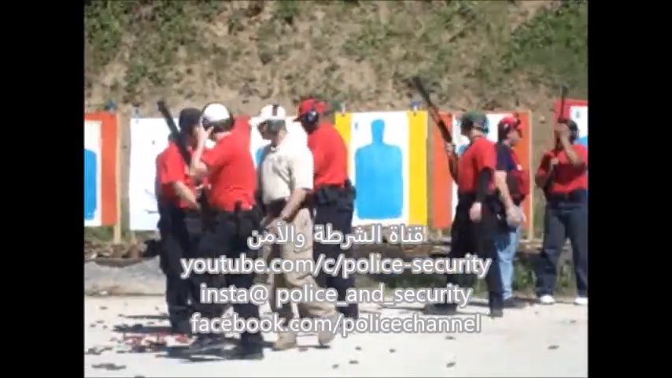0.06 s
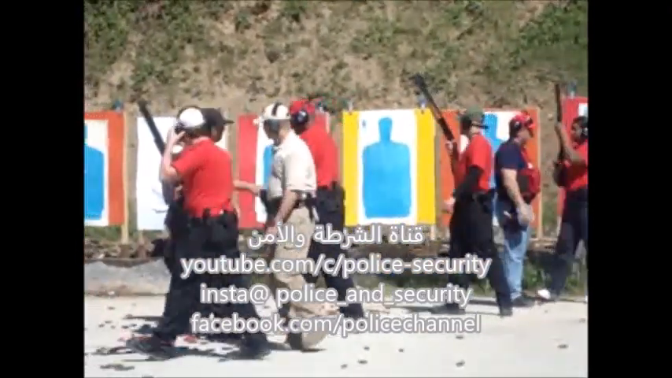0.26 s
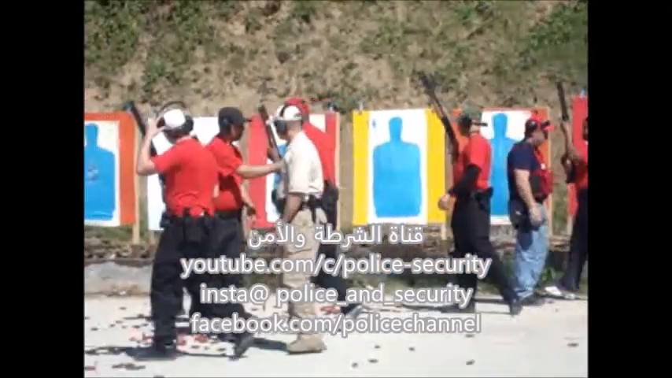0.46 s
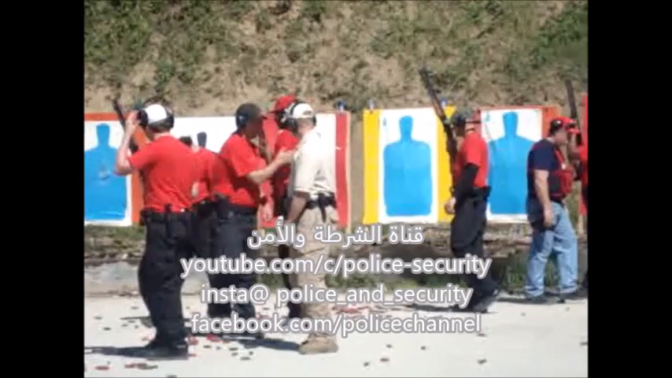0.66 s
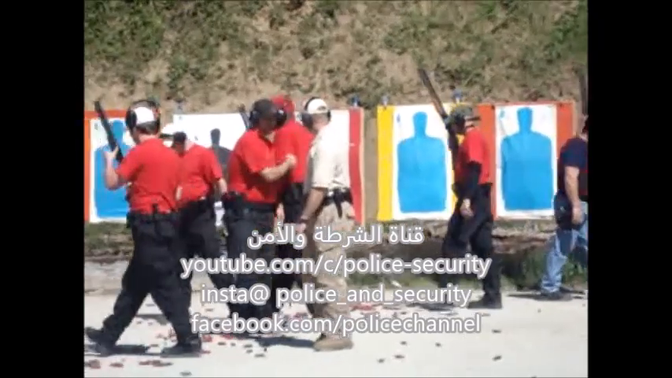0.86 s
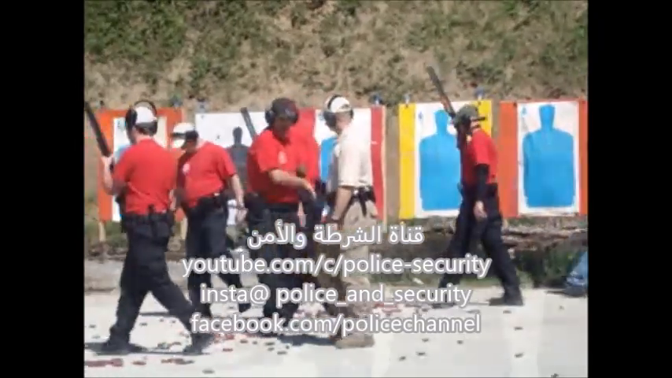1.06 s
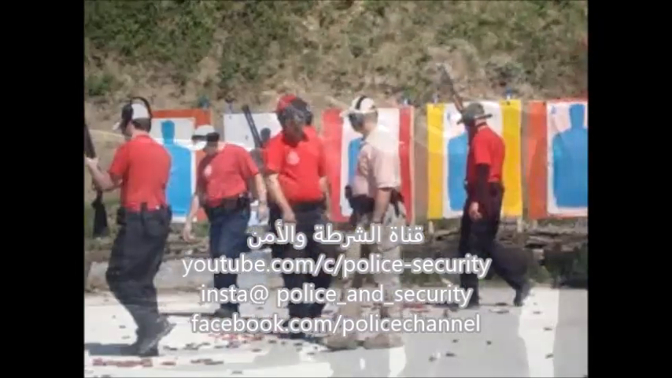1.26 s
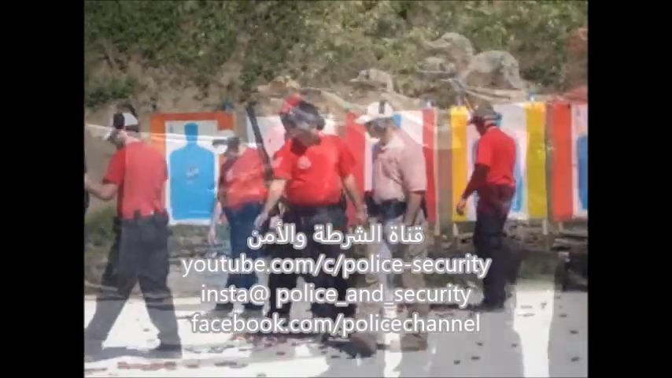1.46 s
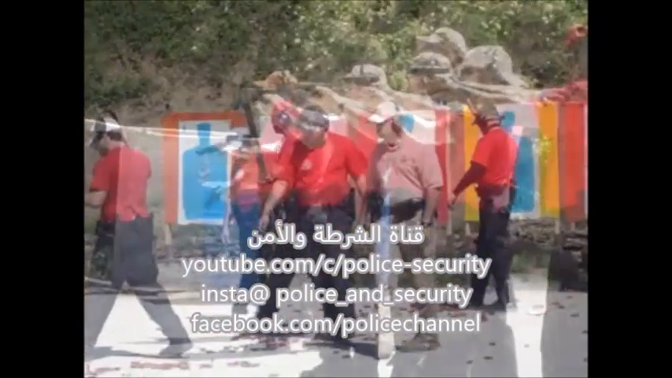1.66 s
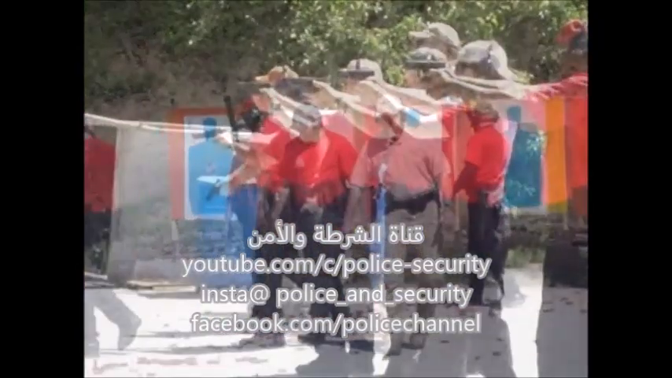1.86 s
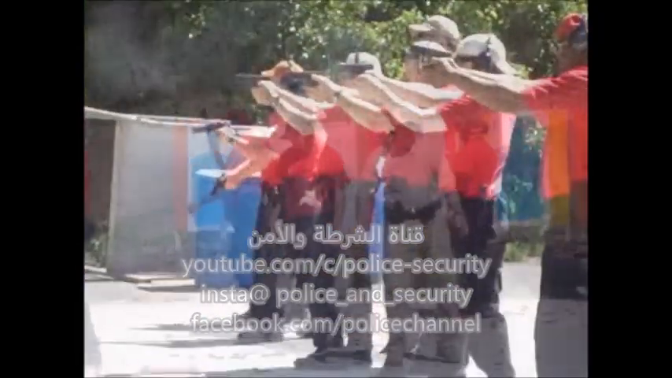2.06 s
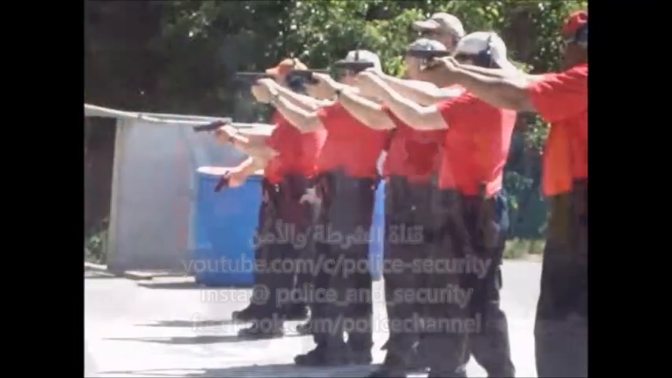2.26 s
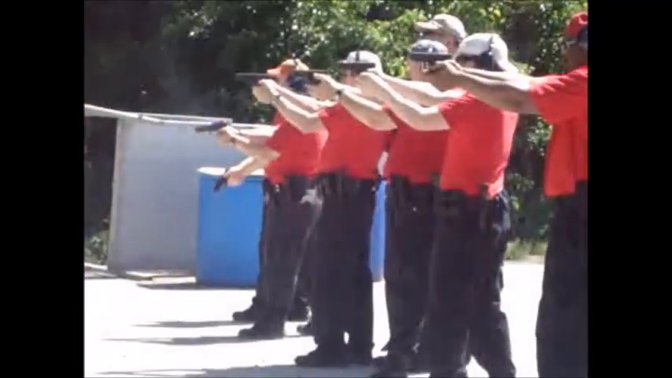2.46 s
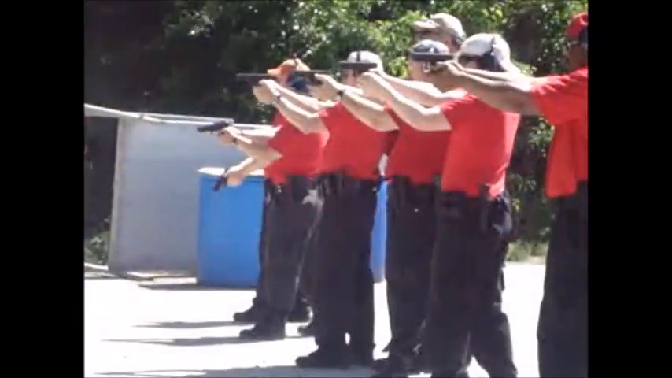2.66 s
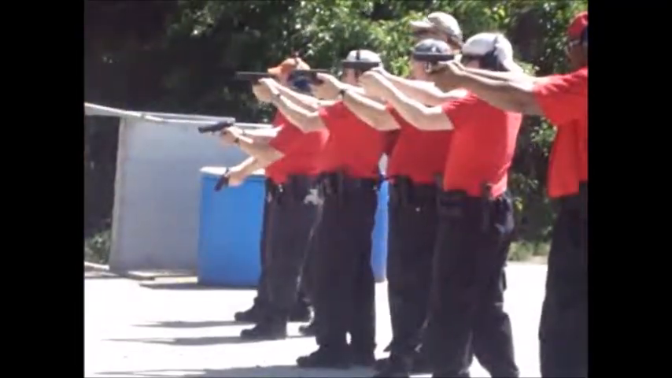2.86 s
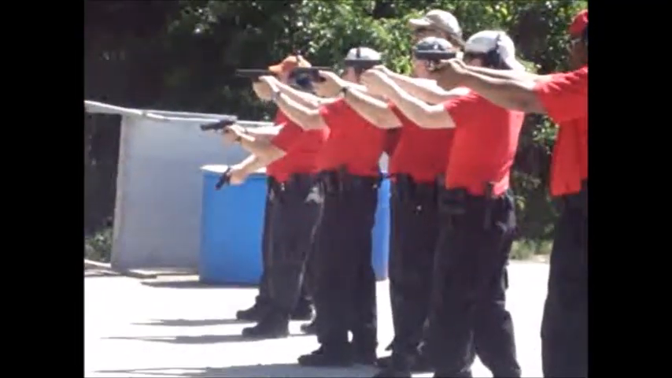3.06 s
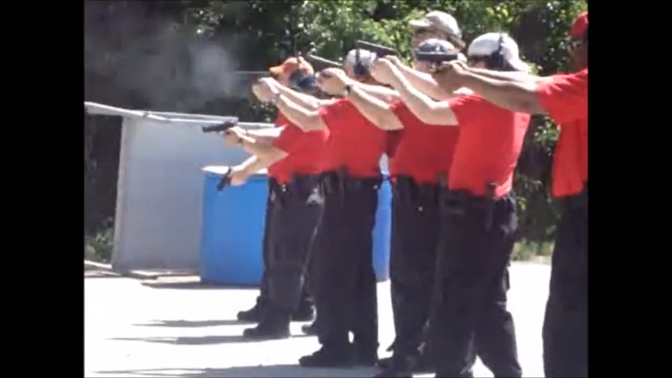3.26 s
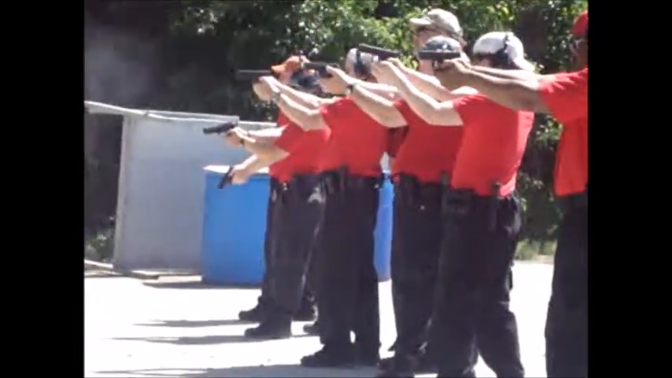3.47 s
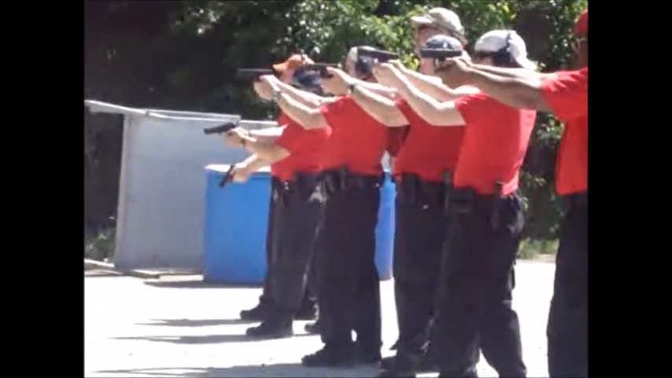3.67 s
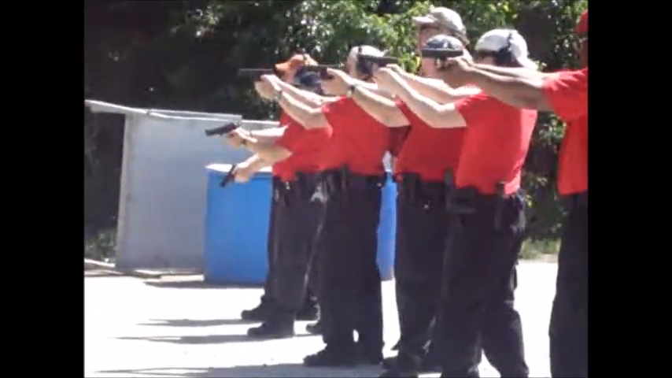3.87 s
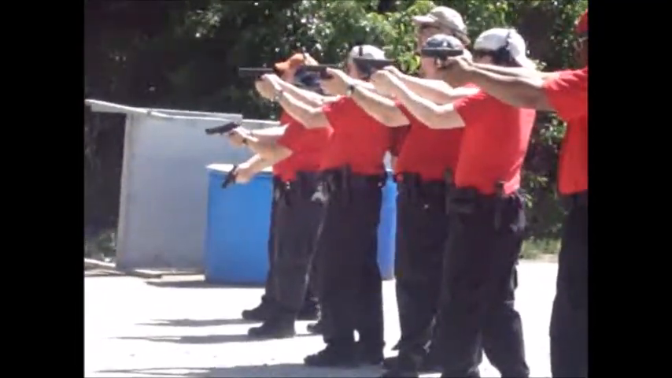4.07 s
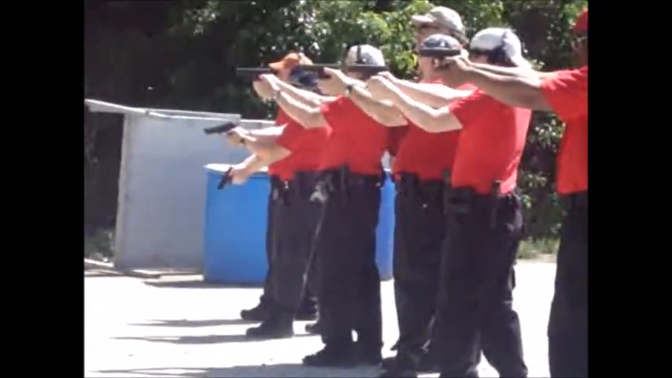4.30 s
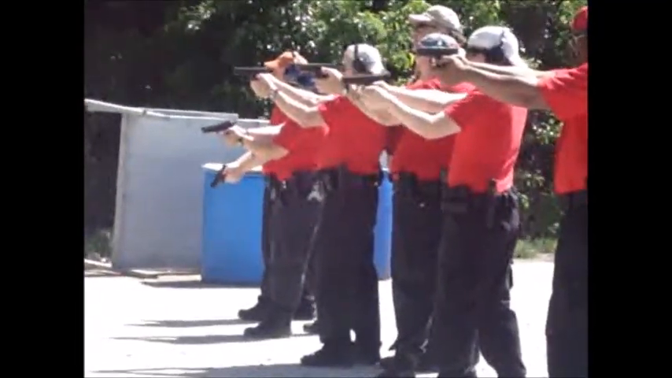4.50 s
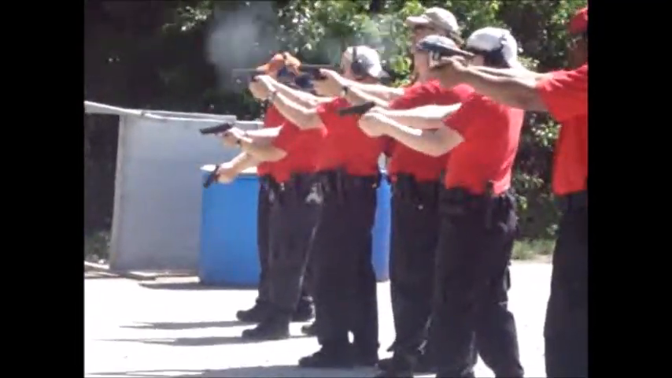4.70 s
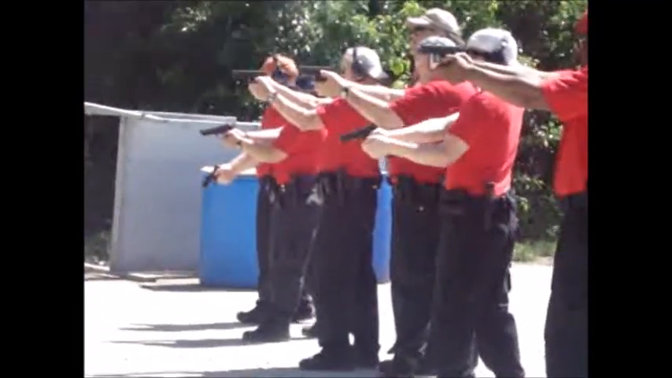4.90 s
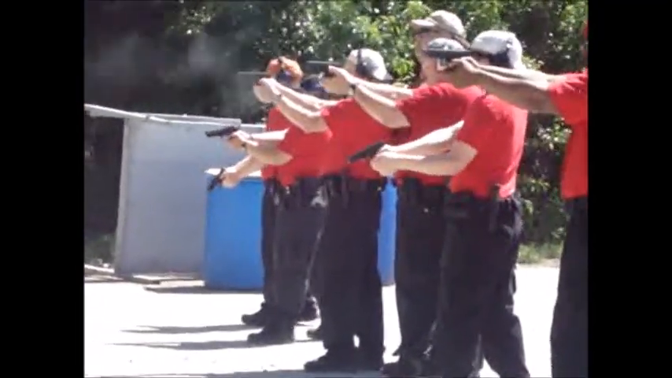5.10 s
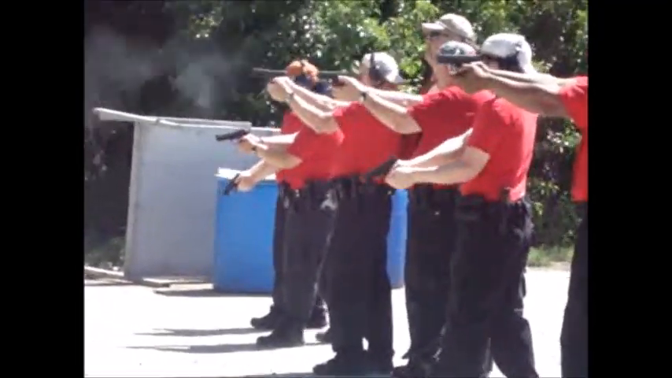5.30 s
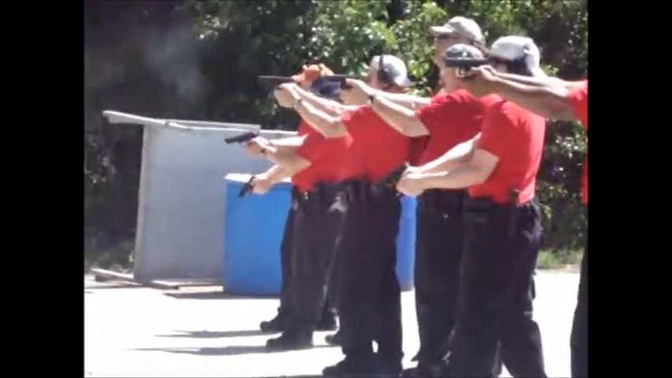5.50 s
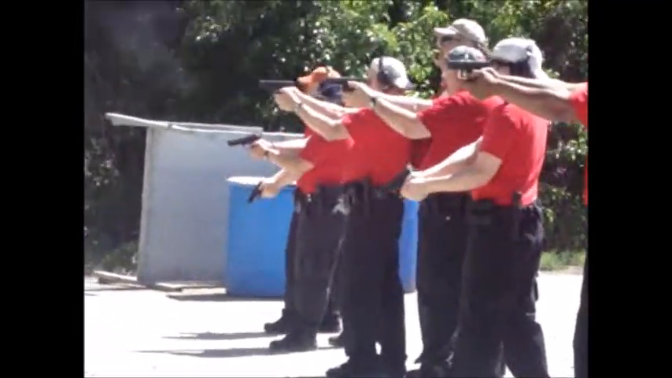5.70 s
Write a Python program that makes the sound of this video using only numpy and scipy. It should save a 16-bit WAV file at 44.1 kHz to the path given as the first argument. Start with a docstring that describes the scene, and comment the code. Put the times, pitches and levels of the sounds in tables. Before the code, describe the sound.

Gun parts clink lightly against a steady far-off roar before a shotgun blast rolls away in the open air. After a few more clinks and dull distant knocks, nearby pistols crack once, then twice in quick succession, then three times. Each crack bounces off a wall and an earth bank and fades among trees. In the later gaps, a soft hush and a faint tone like loudspeaker feedback creep up.

```python
"""Small steel clinks over a distant roar, then a shotgun blast and six pistol shots on an outdoor range.
Each pistol crack reflects off the ground, a side wall and an earth bank, then reverberates in the trees.
Gun parts and spent cases ring at their natural frequencies, and something knocks far off.
The roar gives way to a hush and a ringing tone near 400 Hz, like loudspeaker feedback;
both sink after each pistol shot and swell back. A limiter squeezes the peaks."""
import sys
import numpy as np
from scipy import signal
from scipy.fft import rfft, irfft
from scipy.io import wavfile
from scipy.ndimage import uniform_filter1d

SR = 44100
rng = np.random.default_rng(int(sys.argv[2]) if len(sys.argv) > 2 else 0)


def unload_wav(signal):
    """Save mono or channel-first audio to the path in sys.argv[1] as 16-bit WAV at rate SR, clipped to [-1, 1]."""
    wavfile.write(
        sys.argv[1],
        SR,
        np.round(np.clip(np.atleast_2d(signal).T, -1, 1) * 32767).astype(np.int16),
    )


N = 253342

# shots along the firing line: (time [s], crack [dB], wall echo [dB], bank echo [dB], bank delay [s],
# scatter [dB], tree echo tilt [dB/octave], tree echo decay time [ratio])
PISTOL_SHOTS = [(2.0954, 3.5, -0.5, 1, .0375, -14, 0, 0.89), (3.153, -2, 6, 1.5, .0407, -15.5, -0.2, 0.73),
                (3.2737, 4.5, 6, -1.5, .0391, -21.5, 0.34, 1.09),
                (4.7748, -1.5, 1, 1, 0.042, -15.5, 0.4, 0.93), (5.0266, -2, 4.5, 0, .0392, -18.5, 0, 0.65),
                (5.2486, 5, -3, -4, 0.037, -21, 1.26, 0.89)]
GROUND_DELAY_S, WALL_DELAY_S, TREE_DELAY_S = .001, .0217, .06
def pistols():
    """Multipath propagation: each shot arrives directly, then later by every longer, reflected path."""
    out = np.zeros(N)
    for s, crack_db, wall_db, bank_db, bank_delay, scatter_db, tilt_db, t60_scale in PISTOL_SHOTS:
        muzzle_crack(out, s, crack_db)
        slaps(out, s, crack_db, wall_db, bank_db, bank_delay)
        near_scatter(out, s, scatter_db)
        far_echoes(out, s, scatter_db, tilt_db, t60_scale)
    return out


# spectrum of the muzzle pulse: (frequency [Hz], level [dB])
CRACK_SPECTRUM = [(30, -26), (150, -13), (400, -9.5), (750, 0.5), (1100, 1), (1700, -6.5), (4000, -5.5),
                  (7000, -10.5), (9500, -18.5), (12000, -52)]
def muzzle_crack(out, s, db):
    """Two-path interference: the pressure pulse overlaps its weaker bounce off the ground."""
    crack = -pulse(CRACK_SPECTRUM)
    add(out, s, amp(db) * crack)
    add(out, s + GROUND_DELAY_S, amp(db - 4) * crack)


# glances off the neighbouring shooters: (delay [s], level re the crack [dB])
GLANCES = [(.0021, -11), (.0036, -11.5), (.0049, -11.5)]
# spectra of the wall's slap and of the thud off shooters and bank: (frequency [Hz], level [dB])
SLAP_SPECTRUM = [(30, -27), (150, -27), (320, -19), (550, -1.5), (800, 2.5), (1250, -7), (2100, 1),
                 (3300, -12.5), (6000, -21), (9500, -56), (12000, -47)]
THUD_SPECTRUM = [(30, -41), (150, -25), (400, -12), (650, 2), (950, -3.5), (1300, -8.5), (2100, -11),
                 (4000, -17.5), (7000, -25), (9500, -33), (12000, -60)]
def slaps(out, s, crack_db, wall_db, bank_db, bank_delay):
    """Early reflection: shooters, side wall and earth bank each return a delayed, coloured pulse."""
    slap, thud = -pulse(SLAP_SPECTRUM), -pulse(THUD_SPECTRUM)
    for delay, db in GLANCES:
        add(out, s + delay, amp(crack_db + db) * thud)
    add(out, s + WALL_DELAY_S, amp(wall_db) * slap)
    add(out, s + bank_delay, amp(bank_db) * thud)


# spectrum of the firing line's scatter: (frequency [Hz], level [dB])
SCATTER_SPECTRUM = [(35, -69), (60, -39), (221, -16), (510, -2.5), (929, 1.5), (1520, -8), (2010, -8),
                    (2330, -8.5), (5040, -7), (6380, -10.5), (7100, -16.5), (8980, -17), (10000, -23.5),
                    (13000, -65), (22000, -120)]
def near_scatter(out, s, db):
    """Diffuse scattering from the firing line: bright before the wall's slap, duller after it."""
    bright = reverberation(SCATTER_SPECTRUM, start=.0012, rise=.00088, hold=.019, t60_scale=.079,
                           clump_db=1.5, tilt_db=.42, grain_db=4.5)
    dull = reverberation(SCATTER_SPECTRUM, start=.0032, rise=.0026, hold=.03, t60_scale=.11,
                         clump_db=1.5, tilt_db=-.62, grain_db=6)
    add(out, s, amp(db) * bright)
    add(out, s + WALL_DELAY_S, amp(db - .5) * dull)


# two farther reflectors: (delay [s], level re the scatter [dB])
REFLECTORS = [(.06, -1), (.144, -1.5)]
# spectra returned by those reflectors and by the trees: (frequency [Hz], level [dB])
REFLECTOR_SPECTRUM = [(60, -55.5), (200, -31), (400, -17), (750, 9), (1100, -3), (1700, -6), (4000, -23),
                      (7000, -15), (10000, -29)]
TREE_SPECTRUM = [(35, -69), (60, -42.5), (199, -27.5), (299, -17.5), (362, -12), (556, -3.5), (817, 0.5),
                 (1250, -5), (1660, -11), (2330, -8.5), (2830, -9), (5150, -9.5), (7570, -18),
                 (9380, -22.5), (10000, -31), (13000, -67), (22000, -120)]
def far_echoes(out, s, scatter_db, tilt_db, t60_scale):
    """Multiple scattering among the trees makes a long tail, from which two discrete echoes stand out."""
    tail = reverberation(TREE_SPECTRUM, start=0, rise=.004, hold=.051, t60_scale=t60_scale,
                         clump_db=.8, tilt_db=tilt_db)
    add(out, s + TREE_DELAY_S, amp(scatter_db - 2.5) * tail)
    for delay, db in REFLECTORS:
        add(out, s + delay, amp(scatter_db + db) * burst(REFLECTOR_SPECTRUM, decay=.0092))


# spectrum of the shotgun's scattered blast: (frequency [Hz], level [dB])
BLAST_SPECTRUM = [(88, -58), (150, -44), (319, -21), (381, -10.5), (431, -10), (591, -5), (1020, -1.5),
                  (1730, -16.5), (2680, -8.5), (2970, -8), (4150, -8), (4700, -11.5), (5310, -13),
                  (8690, -21.5), (10000, -32.5), (13000, -70), (22000, -120)]
def shotgun(s=1.071, db=-12):
    """Directivity: fired away from the listener, the blast is heard only as scatter that rolls off."""
    out = np.zeros(N)
    blast = reverberation(BLAST_SPECTRUM, start=.00033, rise=.0059, hold=.069, t60_scale=.83, clump_db=.1)
    add(out, s, amp(db) * blast)
    return out


# decay of the range's echo before t60_scale is applied: (frequency [Hz], T60 [s])
BASE_T60 = [(100, 0.3), (400, 1.28), (900, 1.395), (2000, 1.153), (4500, 0.92), (9000, 0.71)]
def reverberation(spectrum, start, rise, hold, t60_scale, clump_db, tilt_db=0, grain_db=2):
    """A diffuse field builds up and holds (times in s), then each band decays exponentially."""
    size = 3 * SR // 2
    hz, when, bands = signal.stft(noise(spectrum, size, grain_db), SR, nperseg=512)
    octaves = np.log2(np.maximum(hz, 200) / 1500)[:, None]
    t60 = t60_scale * read(BASE_T60, hz)[:, None]
    fall_db = -60 * np.maximum(when - hold, 0) / t60
    # every group of reflectors colours the sound in its own way
    ripple_db = 2.2 * patches(bands.shape, order=(3, 11))
    wave = signal.istft(bands * amp(fall_db + tilt_db * octaves + ripple_db), SR, nperseg=512)[1][:size]
    t = np.arange(size) / SR
    build = 1 - np.exp(-np.maximum(t - start, 0) / rise)
    # reflections arrive in clumps, the short waves more unevenly than the long ones
    treble = signal.sosfiltfilt(signal.butter(2, 5000, "high", fs=SR, output="sos"), wave)
    wave = wave + treble * (amp(1.8 * wander(60, size)) - 1)
    return wave * build * amp(clump_db * wander(70, size))


# impacts of gun parts and cases: (time [s], peak level [dB], T60 [s], pitch [ratio])
CLINKS = [(.005, -24.5, 0.046, 1.07), (.558, -29, 0.034, 1.13), (1.055, -14.5, 0.033, 1.12),
          (1.7125, -27, 0.032, 0.9), (1.8144, -31.5, 0.047, 0.96), (1.851, -27, 0.091, 1.0),
          (1.91, -25.5, 0.05, 1.0), (4.204, -29, .02, 1.2)]
# modes of the steel: (base frequency [Hz], relative level [dB])
STEEL_MODES = [(3900, -4), (4200, 2), (4450, 6), (4700, 5), (5100, -8), (5500, -14), (5850, 1.5),
               (6300, -1.5), (6750, -16), (7300, -27), (8200, -18), (9400, -14)]
def clinks():
    """Modal vibration: a brief scrape of contact, and the struck steel rings in damped modes."""
    out, t = np.zeros(N), np.arange(SR // 3) / SR
    for s, db, t60, pitch in CLINKS:
        ring = 0
        for hz, mode_db in STEEL_MODES:
            cycles = pitch * hz * rng.uniform(.95, 1.01) * t + rng.random()
            ring += amp(mode_db) * np.sin(2 * np.pi * cycles)
        contact = [(2500 * pitch, -30), (4200 * pitch, 0), (6200 * pitch, -4), (9000 * pitch, -16)]
        scrape = noise(contact, len(t)) * np.exp(-t / .003)
        clink = unit(ring) * amp(-60 * t / t60) + .7 * scrape
        add(out, s, amp(db) * clink / abs(clink).max())
    return out


# cases landing on concrete: (time [s], peak level [dB]), and their ring time
CASES, CASE_T60_S = [(1.95, -40.5), (4.582, -50)], .3
def spent_cases():
    """Beating: two close modes of a spent case interfere as they die away."""
    out, t = np.zeros(N), np.arange(SR // 3) / SR
    for s, db in CASES:
        pair = sum(np.sin(2 * np.pi * hz * rng.uniform(.95, 1.01) * t) for hz in (7950, 8200)) / 2
        add(out, s, amp(db) * pair * amp(-60 * t / CASE_T60_S))
    return out


# far impacts: (time [s], level [dB])
KNOCKS = [(1.801, -24), (1.869, -22), (3.950, -33)]
# their spectrum: (frequency [Hz], level [dB])
KNOCK_SPECTRUM = [(100, -35), (350, -14), (650, 0), (1050, -1), (1600, -18), (3000, -38), (10000, -60)]
def knocks():
    """Heavy damping: each dull, far knock dies too soon to have a clear pitch."""
    out = np.zeros(N)
    for s, db in KNOCKS:
        add(out, s, amp(db) * burst(KNOCK_SPECTRUM, decay=.009))
    return out


# partials of the ringing tone: (harmonic [number], relative level [dB])
TONE_HARMONICS = [(1, 0), (2, -5), (3, -21), (5, -25)]
def ringing_tone(tone_hz=398.3):
    """Harmonic series: a tone like loudspeaker feedback swells between shots, over faint low drones."""
    cycles = np.cumsum(tone_hz * (1 + .0015 * wander(12, N))) / SR
    tone = sum(amp(db + 1.3 * wander(6.8, N)) * np.sin(2 * np.pi * k * cycles)
               for k, db in TONE_HARMONICS)
    roar_drone = np.sin(2 * np.pi * np.cumsum(195 + 6 * wander(13.2, N)) / SR)
    hush_drone = np.sin(2 * np.pi * np.cumsum(167 + 1.94 * wander(4.6, N)) / SR)
    return (unit(tone) * hush_gain(-38.5, sink_db=39)
            + roar_drone * amp(ROAR_DB - 19.5) * roar_share()
            + hush_drone * hush_gain(-64.5, sink_db=13.5))


# spectra of the distant roar, the softer hush and a thin hiss: (frequency [Hz], level [dB])
ROAR_SPECTRUM = [(15, -62), (25, -32), (85, -14.5), (113, -13.5), (164, -11.5), (190, -10.5), (375, -8),
                 (506, -6), (924, 1), (2340, -22.5), (3000, -25.5), (4370, -25.5), (6060, -32.5),
                 (7040, -35.5), (10000, -41), (13000, -86), (22000, -120)]
HUSH_SPECTRUM = [(25, -43), (70, -23.5), (130, -15), (200, -17), (300, -8.5), (420, -1.5), (750, -1),
                 (1050, -2), (1450, -10), (2000, -15.5), (4000, -21.5), (10000, -31.5)]
HISS, HISS_DB = [(100, -26), (1000, 1), (2500, 1), (5000, -5), (10000, -8.5)], -58.5
ROAR_DB, HUSH_DB = -34, -42.5
def background():
    """Broadband ambient noise: a roar and then a hush, both gently uneven, over a steady hiss."""
    roar = noise(ROAR_SPECTRUM, N) * amp(ROAR_DB + .5 * wander(30, N)) * roar_share()
    hush = noise(HUSH_SPECTRUM, N) * amp(.55 * wander(20, N)) * hush_gain(HUSH_DB, sink_db=9.5)
    return roar + hush + amp(HISS_DB) * noise(HISS, N)


def roar_share(end_s=2.48, fade_s=.05):
    """Linear crossfade: 1 while the roar lasts, 0 once the hush has taken over."""
    return np.clip((end_s - np.arange(N) / SR) / fade_s, 0, 1)


def hush_gain(db, sink_db, hold_s=.54, recover_s=.36):
    """Ducking: the level enters as the roar ends, sinks at each pistol shot, holds, then creeps back."""
    t, since_shot = np.arange(N) / SR, np.zeros(N)
    for s, *_ in PISTOL_SHOTS:
        since_shot = np.where(t >= s, t - s, since_shot)
    sunk = np.exp(-np.maximum(since_shot - hold_s, 0) / recover_s)
    return amp(db - sink_db * sunk) * (1 - roar_share())


def pulse(colour, size=4096):
    """A causal pressure pulse with the given spectrum, peak 1: a spike, then a broad swing back."""
    log_gain = np.log(amp(read(colour, abs(np.fft.fftfreq(size, 1 / SR)))))
    wave = np.fft.ifft(np.exp(np.conj(signal.hilbert(log_gain)))).real[:size // 2]
    # low frequencies lag behind the high ones
    wave = signal.lfilter([.85, -1], [1, -.85], wave)
    return wave / abs(wave).max()


def burst(colour, decay):
    """A short puff of noise with a rounded start."""
    t = np.arange(SR // 6) / SR
    return noise(colour, len(t)) * np.exp(-t / decay) * (1 - np.exp(-(t / .0015) ** 2))


def noise(colour, size, grain_db=0):
    """Noise of rms 1 with the given spectrum; grain_db lets single impulses stand out."""
    white = rng.standard_normal(size) * amp(grain_db * rng.standard_normal(size))
    return unit(irfft(rfft(white) * amp(read(colour, np.fft.rfftfreq(size, 1 / SR))), size))


def wander(rate, size):
    """Slow chance of rms 1, up to about rate changes a second."""
    f = np.fft.rfftfreq(size, 1 / SR)
    return unit(irfft(rfft(rng.standard_normal(size)) * np.exp(-(f / rate) ** 2) * (f > 0), size))


def patches(shape, order=(7, 14)):
    """A random field of rms 1, smooth over frequency and time."""
    field = rng.standard_normal(shape)
    for axis, size in enumerate(order):
        field = uniform_filter1d(field, size, axis)
    return unit(field)


def read(points, hz):
    """Reads a spectrum on a log-frequency axis."""
    f, value = np.transpose(points)
    return np.interp(np.log(hz + 1), np.log(f + 1), value)


def amp(db):
    return 10 ** (np.asarray(db) / 20)


def unit(x):
    """Scales to an rms of 1."""
    return x / np.sqrt(np.mean(x ** 2) + 1e-20)


def add(mix, s, sound):
    part = mix[max(round(s * SR), 0):][:len(sound)]
    part += sound[:len(part)]


def scene():
    """Superposition: the pressures of all sources add in one channel."""
    events = pistols() + shotgun() + clinks() + spent_cases() + knocks()
    return (events + background() + ringing_tone())[None]


def record(dry, limit_db=-2, recover_db_per_s=500, attack_s=.0012, edge_hz=10200):
    """Peak limiting ducks the sound just after each peak; soft saturation and band limiting follow."""
    over_db = np.maximum(20 * np.log10(abs(dry[0]) + 1e-9) - limit_db, 0)
    recovery_db = np.arange(N) * recover_db_per_s / SR
    duck_db = np.maximum.accumulate(over_db + recovery_db) - recovery_db
    pole = np.exp(-1 / (attack_s * SR))
    limited = dry * amp(-signal.lfilter([1 - pole], [1, -pole], duck_db))
    saturated = limited / (1 + (limited / .85) ** 6) ** (1 / 6)
    bass_cut = signal.lfilter(*signal.butter(1, 50, "high", fs=SR), saturated)
    low_pass = signal.firwin(401, edge_hz, window=("kaiser", 8), fs=SR)
    return signal.oaconvolve(bass_cut, low_pass[None], "same")


dry = scene()
out = record(dry)
unload_wav(out)
```